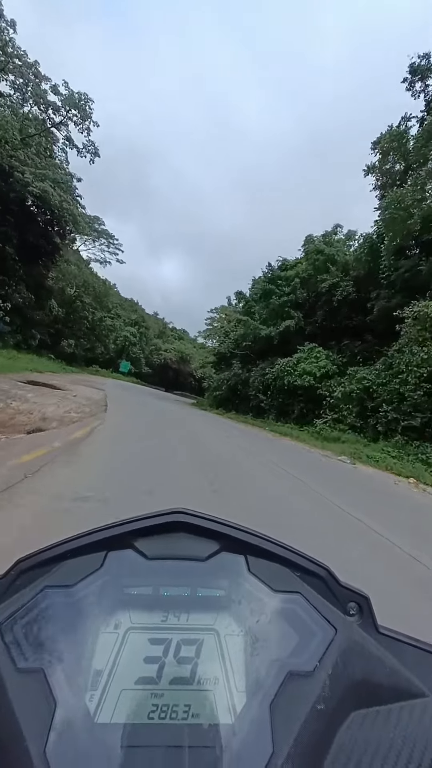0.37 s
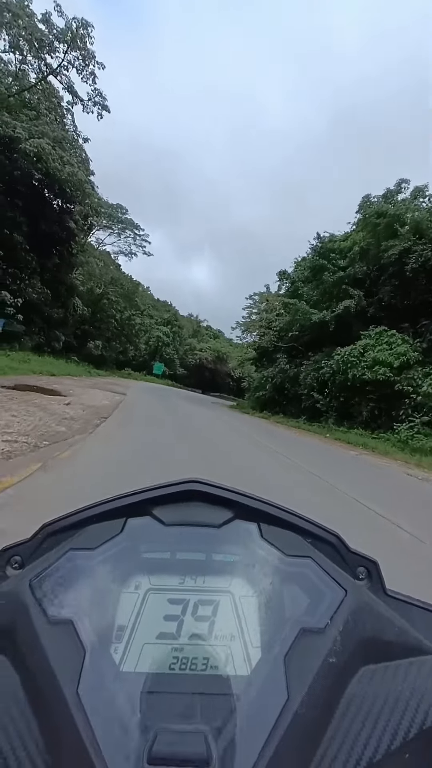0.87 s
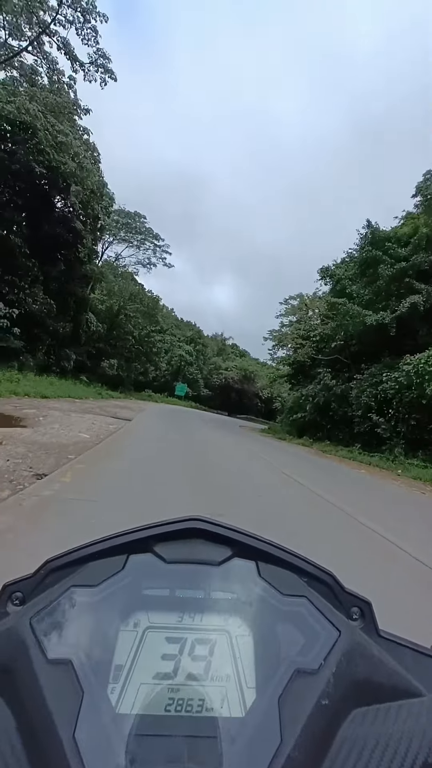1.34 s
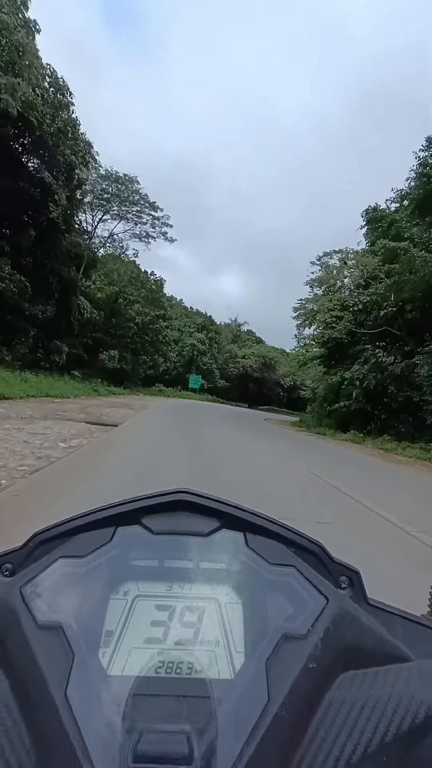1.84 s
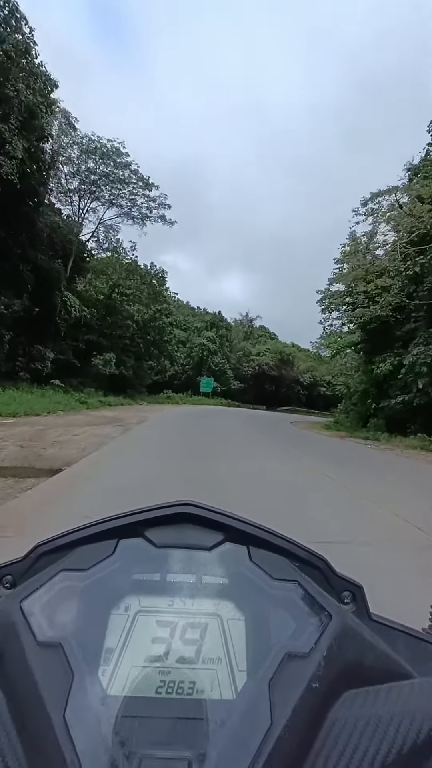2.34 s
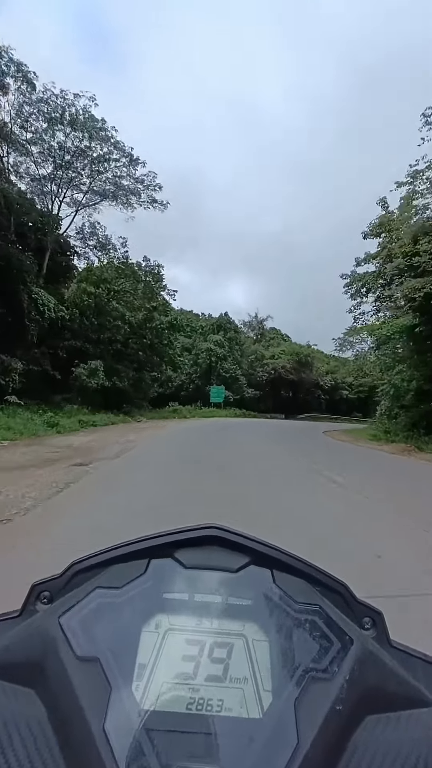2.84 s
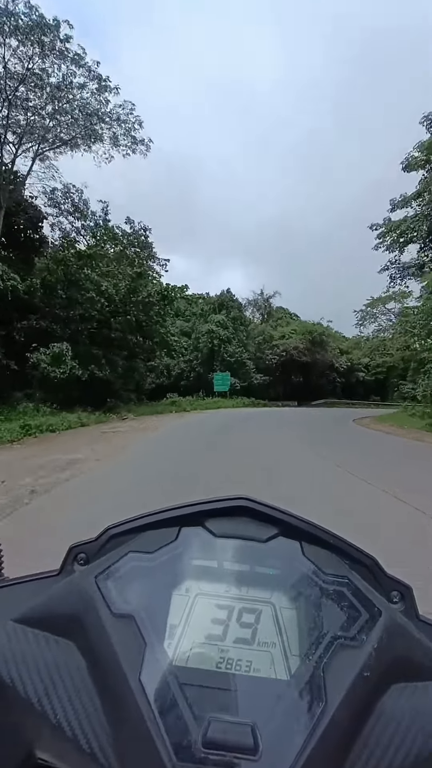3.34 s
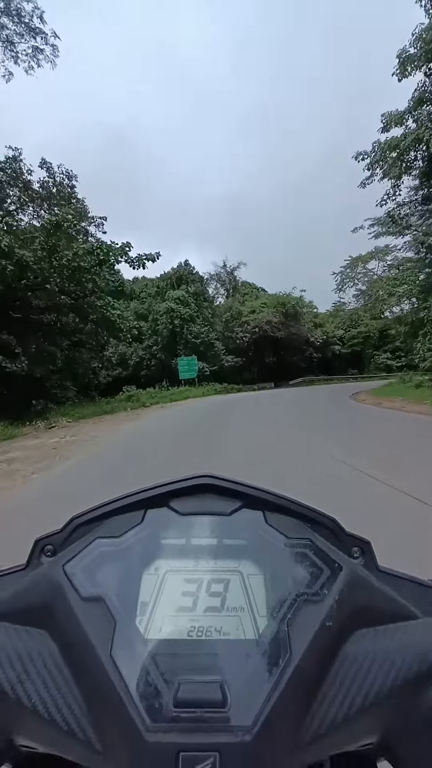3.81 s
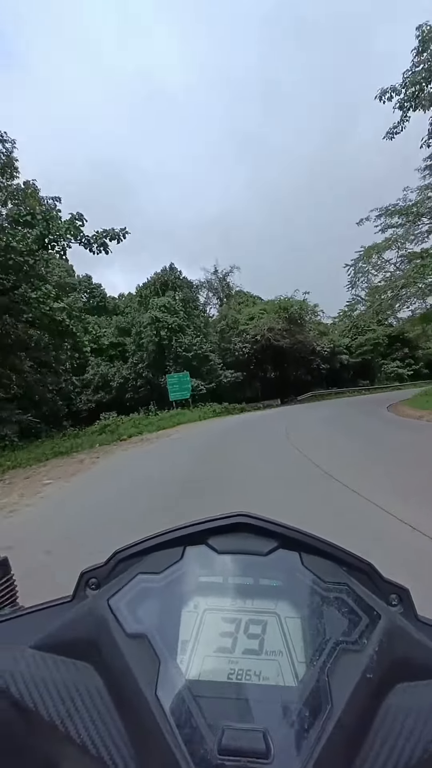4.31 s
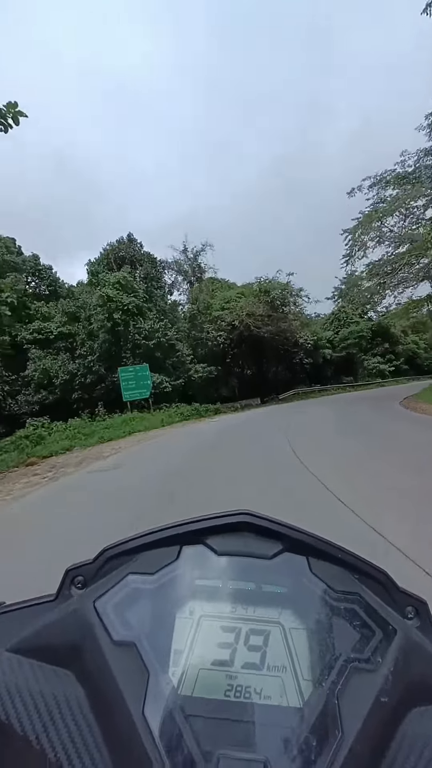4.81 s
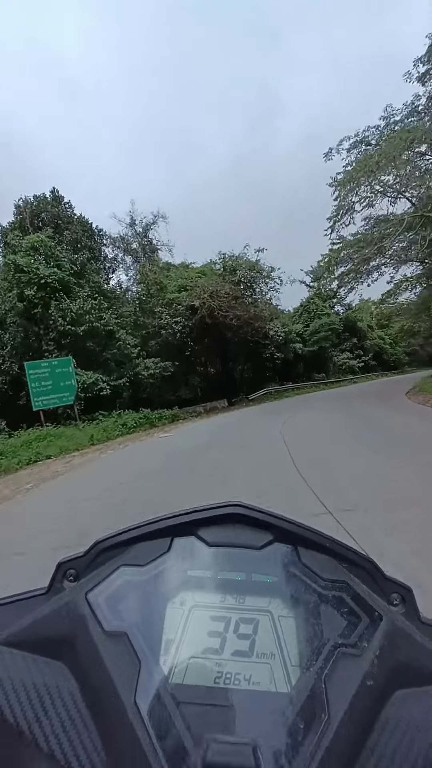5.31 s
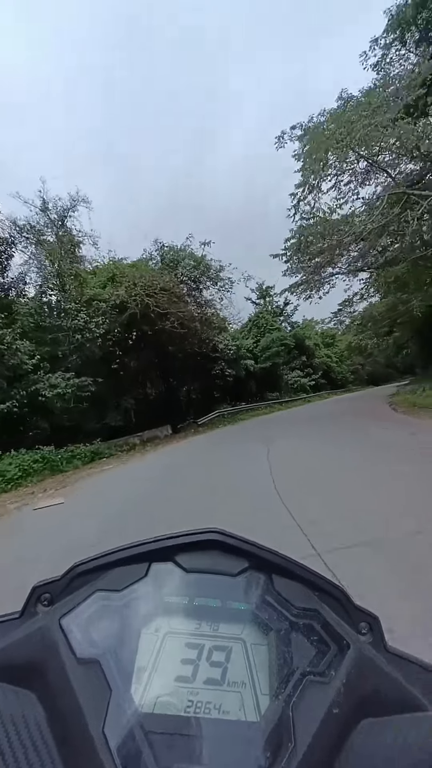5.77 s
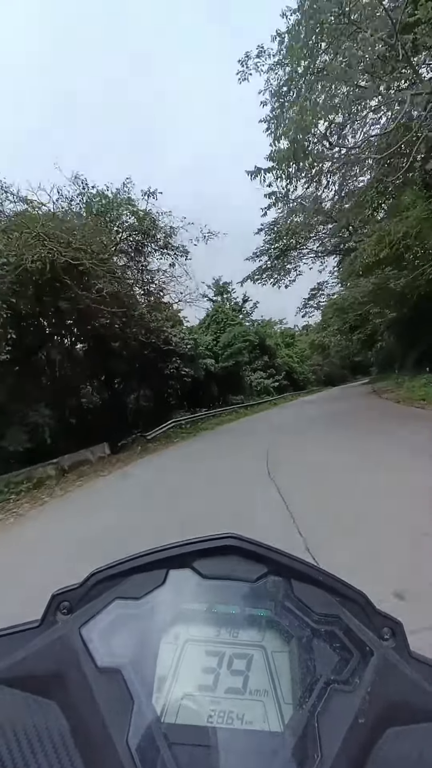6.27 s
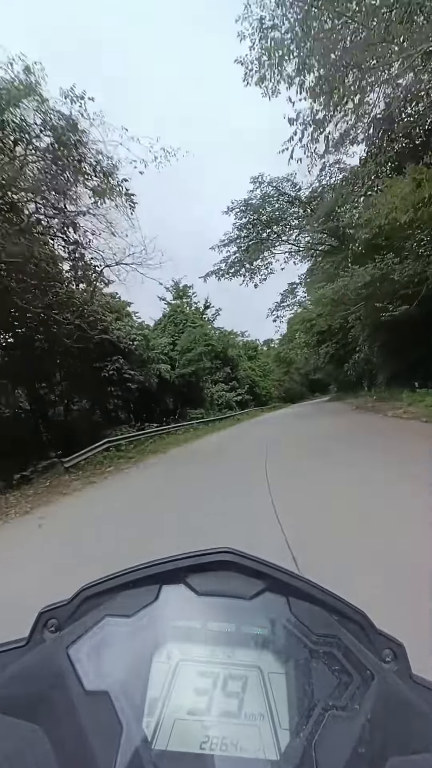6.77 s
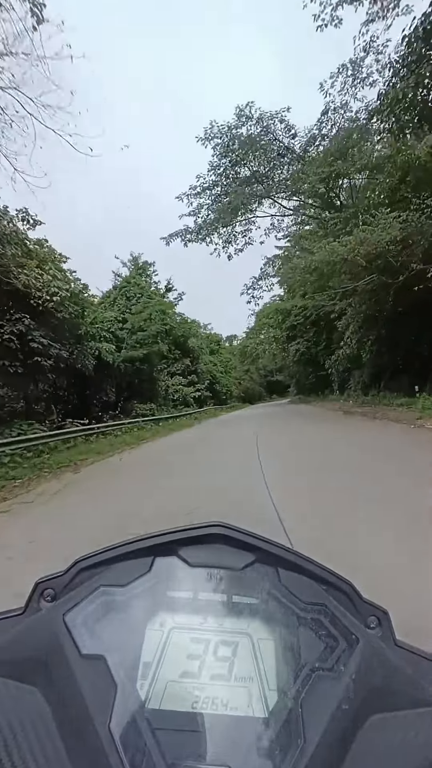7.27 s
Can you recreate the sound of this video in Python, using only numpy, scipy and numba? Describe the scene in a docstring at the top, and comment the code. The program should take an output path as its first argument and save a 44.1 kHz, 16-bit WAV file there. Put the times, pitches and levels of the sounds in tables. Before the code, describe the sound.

From 0 s to about 7.6 s a small scooter rides at a steady speed, its open stereo microphone battered by headwind. The wind is a dense low roar, fluttering and popping with irregular slaps, far louder and nearly overloaded on the right; the left is softer, with occasional thumps. Beneath it, mostly on the left, are a low, even engine hum, a faint grainy whine near 2.8 kHz and the airy hiss of tyres and foliage. From 0 to 1.3 s high, short friction squeaks chatter several times per wheel turn; they thin into scratchier, higher chirps about once a turn and cease around 3.3 s. The whine dips near 2 s, then returns. From about 4.5 s a very faint, high cicada buzz on the left grows, strongest after 6 s. Around 6.5 to 7 s hiss and whine rise, and the wind continues to an abrupt end.

```python
"""A small scooter rides a forest road at a steady speed, the two microphone ports open to the headwind.
From the start, convected eddies buffet each port on its own and drive a fast limiter, hardest on the right;
under them random resonances give the engine hum and belt whine, and shaped noise the hiss of tyres and leaves.
A friction squeak of tones and scrapes comes several times a wheel turn, then about once, for three seconds.
Later the cicadas, buzzing bands of noise, swell as the trees close in, and hiss and whine rise near the end."""
import sys
import numpy as np
from scipy import signal
from scipy.fft import rfft, irfft, next_fast_len
from scipy.io import wavfile
from scipy.ndimage import uniform_filter1d, minimum_filter1d, map_coordinates
from numba import njit

SR = 44100
rng = np.random.default_rng(int(sys.argv[2]) if len(sys.argv) > 2 else 0)


def boost_factor(decibels):
    """Convert a level in decibels to a linear amplitude factor."""
    exponent = np.asarray(decibels, float) / 20
    return 10 ** exponent


def wav_record(signal):
    """Record a signal, one row per channel, as 16-bit PCM in the file named by sys.argv[1]."""
    frames = np.transpose(np.atleast_2d(signal))
    bounded = np.clip(frames, -1, 1)
    # unit amplitude maps onto the largest positive 16-bit level
    quanta = np.round(bounded * 32767).astype(np.int16)
    wavfile.write(sys.argv[1], SR, quanta)


N = 336483
T = np.arange(N) / SR

# chorus resonances: pitch_hz, nominal_width_hz, relative_level_db
CICADA_BANDS = [(8160, 810, -5.5), (8620, 650, 1), (9170, 520, -6)]
# the chorus drifts in pitch as other trees pass; only departures from the mean count: time_s, centre_hz
CHORUS_DRIFT = [(0.0, 8690), (0.1, 8560), (6.82, 8540), (7.05, 8720), (7.63, 8660)]
CICADA_BUZZ_HZ, CICADA_BUZZ_DEPTH, CICADA_RIGHT_DB = 199, 0.15, -24

# spectral density of the broad hiss before the roadside gain: pitch_hz, left_db_per_hz, right_db_per_hz,
# likeness_of_channels (0-1; above about 6 kHz the two channels are mostly alike but for level)
HISS_SPECTRUM = [(255, -60.5, -43, 0.26), (880, -56, -52, 0.61), (1820, -68, -68, 0.25),
                 (2200, -63.5, -65, 0.35), (3210, -69, -72.5, 0), (3590, -72, -73, 0.24),
                 (5520, -77, -78.5, 0), (6200, -85.5, -82.5, 0.8), (6900, -91, -79, 1),
                 (7800, -84, -96, 0.9), (10500, -89.5, -96.5, 0.7), (11500, -90, -96, .6),
                 (13300, -100, -96, 1), (15700, -102, -92, 1)]
# slow courses along the road: time_s, hiss_gain_db, near_leaves_treble_gain_db, cicada_level_db, whine_level_db
ROADSIDE_COURSE = [(0, -1, 1.5, -50, -43), (1, -2.5, 1.5, -50.5, -43), (2, -1.5, 0.5, -49.5, -58),
                   (3, -2, 1, -48, -42), (4, -3, 1, -48.5, -43), (4.6, -1.5, 2.5, -46.5, -39),
                   (5.3, -2, 2.5, -46, -39), (6, -1, 3, -44.5, -40), (6.5, 1, 3, -45, -37.5),
                   (7, 0, 4.5, -44.5, -34.5), (7.63, 0.5, 5.5, -46, -36)]
LEAVES_HZ = 4170
PORT_LAG = 18  # samples by which the left port hears the scooter late

WHINE_HZ, WHINE_WIDTH_HZ, WHINE_RIGHT_DB = 2790, 390, -10

# wavering engine and gear tones: pitch_hz, nominal_width_hz, left_level_db
ENGINE_TONES = [(58.6, 5.1, -27), (167.4, 9.2, -36.5), (220, 3, -39), (334, 2.5, -51), (1479, 67, -47)]

# rubs of the squeak, crowded at first, several to a wheel turn, later about one a turn:
# start_s, length_s, low_mode_db, upper_pair_db
SQUEAK_RUBS = [(0, .06, -35, -50), (.12, .03, -35, -60), (.163, .02, -34, -60), (.243, .042, -32, -58),
               (.296, .022, -30, -47), (.378, .035, -38, -52), (.41, .025, -34, -47), (.433, .05, -31, -46),
               (.535, .018, -29, -60), (.555, .012, -33, -60), (.578, .026, -38, -58),
               (.605, .022, -32, -48), (.728, .026, -38, -52), (.754, .04, -31, -46),
               (.838, .024, -31, -52), (.913, .016, -30, -50), (.93, .05, -46, -49), (1.02, .025, -39, -60),
               (1.068, .04, -37, -60), (1.15, .03, -34, -60), (1.18, .045, -37, -60),
               (1.222, .035, -35, -46), (1.255, .04, -50, -49), (1.33, .05, -41, -58),
               (1.39, .055, -50, -47), (1.483, .034, -33, -56), (1.555, .04, -50, -48),
               (1.6, .027, -32, -60), (1.64, .02, -39, -60), (1.7, .055, -44, -47), (1.85, .06, -43, -47),
               (1.93, .08, -41, -56), (2.01, .03, -35, -45), (2.14, .12, -50, -47), (2.32, .09, -52, -47),
               (2.47, .07, -52, -47), (2.635, .05, -52, -47), (2.795, .065, -50, -47),
               (2.97, .04, -50, -49), (3.11, .04, -50, -48), (3.29, .04, -50, -49)]
# upper resonances of the squeak: pitch_hz, nominal_width_hz, level_db relative to the upper_pair_db of a rub
SQUEAK_UPPER_MODES = [(4310, 130, -1), (4620, 110, -2)]
SQUEAK_HZ, SQUEAK_WAVER_HZ, RUB_EDGE_S = 2860, 34, .008
SQUEAK_RIGHT_DB = (0, -5)  # low mode, upper pair

# slow course of the headwind: time_s, left_level_db, right_level_db, right_flow_speed_octaves
GUST_COURSE = [(0, -8, 4.5, -0.28), (.5, -11.5, 2.5, 0.0055), (.9, -11.5, -4, 0.035),
               (1.25, -11.5, 2, 0.064), (1.7, -8.5, 2, 0.095), (2.15, -11, 3, 0.13), (2.5, -10, 0, -0.079),
               (2.8, -9.5, 0, 0.078), (3.3, -9.5, 2, 0.1), (3.7, -6.5, 2, 0.013), (4.2, -11.5, -2.5, -.12),
               (4.65, -11, -0.5, 0.088), (4.95, -5.5, 3.5, .12), (5.25, -12.5, 1.5, -0.089),
               (5.5, -11.5, 0, 0.095), (5.95, -11, 1, -0.1), (6.4, -14, 1, -0.047), (7, -12.5, 0, 0.038),
               (7.63, -11.5, 0, -0.048)]
# longer spells of faster flow at the right port: centre_s, speed_up_octaves, length_s
FLOW_FLURRIES = [(0.489, 0.31, 0.047), (0.916, .4, 0.051), (1.261, .4, 0.079), (1.99, 0.31, .06),
                 (2.189, 0.34, 0.062), (2.699, 0.35, 0.072), (3.682, 0.29, 0.081), (4.621, 0.41, 0.089),
                 (4.878, .35, .14), (5.47, 0.38, 0.049), (5.66, .3, 0.051), (7.0, 0.36, 0.058),
                 (7.58, 0.32, 0.067)]
# pressure spectrum of the flow, before scaling to rms 1: pitch_hz_at_mean_speed, left_db_per_hz, right_db_per_hz
FLOW_SPECTRUM = [(12.1, 6.5, 13.5), (25.4, 3.5, 7), (62, -6.5, 5.5), (123, -4, 3.5), (234, -11.5, -1),
                 (451, -20, -8.5), (793, -31, -25.5), (1300, -42, -39.5), (2500, -77, -78)]
# strongest small fast eddies: time_s, port (0 left, 1 right), nominal_top_pitch_hz, length_ms,
# slap_db (over the gust level, before SLAP_DB)
STRONG_EDDIES = [(0.06, 1, 1310, 2.27, -18), (0.13, 1, 960, 2.28, -13), (0.132, 0, 594, 3.7, 4),
                 (0.187, 1, 1310.0, 2.2, -20), (0.373, 1, 693, 4.6, -17), (0.473, 1, 935, 2.55, -10),
                 (0.493, 1, 1200.0, 2.6, -23), (0.559, 1, 1656, 2, -12.5), (0.704, 1, 722, 3.0, -9),
                 (0.906, 1, 693, 2.6, 1), (0.919, 0, 1317, 3.27, -5), (0.987, 1, 1884, 2.23, -16),
                 (1.151, 1, 1239, 2.4, -20), (1.181, 0, 801.3, 6.26, -11), (1.24, 1, 788, 3.96, -5),
                 (1.282, 1, 1123, 2.93, -12), (1.446, 0, 624, 3.0, -1), (1.487, 1, 1177, 2.64, -19),
                 (1.576, 0, 521.7, 6.6, -6), (1.615, 0, 787.3, 5.03, -9), (1.626, 0, 777, 3.4, -7),
                 (1.782, 1, 1193, 3.7, -28), (1.822, 1, 1300.0, 2.74, -20), (1.839, 0, 590.2, 3.02, -5),
                 (1.963, 1, 731.8, 3.32, -12), (2.006, 1, 1097, 2.34, -12), (2.177, 1, 1169, 2.42, -14),
                 (2.193, 1, 1226, 2.95, -19), (2.517, 1, 749.5, 3.22, -4.5), (2.614, 1, 880.0, 3.2, -8),
                 (2.695, 1, 1343, 2.73, -29), (2.72, 1, 1161, 2.05, -17), (2.868, 1, 2170.0, 1.96, -23),
                 (2.918, 1, 720.8, 2.87, -5), (3.143, 1, 1160.0, 3.96, -25), (3.17, 1, 2060, 2.06, -17),
                 (3.363, 1, 1288, 2.5, -13), (3.593, 1, 689, 3.26, -13), (3.636, 0, 810.0, 2.52, -12),
                 (3.649, 1, 1356, 2.65, -15), (3.693, 0, 621, 3.25, -2), (3.727, 0, 519, 4.8, -2),
                 (3.75, 1, 919.3, 2.62, -17), (3.871, 0, 612.3, 3.02, -5), (4.01, 1, 920.8, 2.46, -13),
                 (4.584, 1, 1031, 3.5, -19), (4.615, 1, 1121, 4, -25), (4.64, 1, 1002, 2.3, -7),
                 (4.728, 1, 580.3, 4.38, -8), (4.84, 1, 1211, 2.08, -12), (4.87, 1, 981.6, 2.72, -16),
                 (4.919, 1, 1122, 2.48, -18), (4.937, 1, 936.7, 2.8, -18), (5.007, 1, 1143, 2.56, -26),
                 (5.054, 0, 730.6, 3.83, -13), (5.075, 1, 1105, 2.92, -12.5), (5.185, 0, 791, 2.79, -2),
                 (5.456, 1, 980.0, 4.38, -12), (5.474, 1, 1128, 5.03, -9), (5.544, 1, 941.4, 2.68, -14),
                 (5.654, 1, 1216, 2.2, -9), (5.932, 1, 1229, 2.24, -15), (6.243, 1, 928.3, 5.2, -9),
                 (6.362, 0, 751, 3.04, -5), (6.544, 1, 1182, 2.46, -18), (6.575, 1, 1265, 2.57, -18),
                 (6.645, 1, 1269, 2.87, -19), (6.736, 1, 1725, 1.95, -21), (6.751, 1, 1314, 2.51, -18),
                 (6.997, 1, 941.2, 3.0, -1), (7.067, 1, 1026, 3.22, -13), (7.086, 1, 1208, 2.11, -18),
                 (7.127, 1, 1214, 3.2, -19), (7.219, 1, 884.6, 3.42, -13), (7.265, 0, 541, 2.87, 2),
                 (7.401, 1, 1233, 2.14, -17), (7.571, 1, 1116, 2.25, -8), (7.608, 1, 1209, 2.36, -12)]
# lesser eddies at each port come at random; the slowest is the longest
STRAY_EDDIES, STRAY_HZ, STRAY_MS = 70, (449.95, 848.5), (3, 1.5)
GUSTS_PER_S = 12  # quick random gusts on top of the slow course
EDDY_REST_HZ = 230  # eddy pitch at the mean flow speed
EDDY_PULL = .58  # share of an eddy's speed-up that the surrounding flow takes on
# an eddy gathers speed slowly and tears off at once, in eddy lengths
BUILD_UP, BREAK_OFF, TEARS_AT = 1.2, .12, .25
SLAP_DB = 1  # common level of the slaps
SLAP_SWEEP_OCTAVES, SLAP_SHARPNESS = 1.8, .17  # rise in pitch through a slap, share of its overtone

LOW_CUT_HZ, FADE_S = 52, .006  # the fade is at both ends
CEILING, RELEASE_S, LOOK_AHEAD_S = .87, .011, .0015  # limiter; the ceiling is an amplitude


def band(x, hz, width):
    """Second-order resonance with gain 1 at its centre."""
    return signal.lfilter(*signal.iirpeak(hz, hz / width, fs=SR), x)


def double_band(x, hz, width):
    """Two equal resonances in cascade, for steeper skirts."""
    return band(band(x, hz, width), hz, width)


def unit(x):
    """Normalisation to rms 1."""
    return x / np.sqrt(np.mean(x ** 2))


def spectrum(table, column, count):
    """Spectral interpolation: a column on the bins of a transform of count samples, straight on a log axis."""
    table = np.array(table, float)
    hz = np.arange(count // 2 + 1) * SR / count + 1
    return np.interp(np.log(hz), np.log(table[:, 0]), table[:, column])


def walk(rate):
    """Band-limited random modulation: levels held 1 / rate s and slewed twice; spread near 1."""
    hold = int(SR / rate)
    steps = np.repeat(rng.standard_normal(N // hold + 1), hold)
    return 1.3 * uniform_filter1d(uniform_filter1d(steps, hold), hold)[:N]


def curves(table):
    """Linear interpolation of every column of a timed table, sample by sample."""
    s, *columns = np.transpose(table)
    return np.array([np.interp(T, s, c) for c in columns])


def shift_pitch(x, drift_hz):
    """Single-sideband shift: the analytic signal turned by a running phase moves by drift_hz."""
    turning = np.exp(2j * np.pi * np.cumsum(drift_hz) / SR)
    return np.real(signal.hilbert(x, next_fast_len(N))[:, :N] * turning)


def cicadas(level_db):
    """Amplitude-modulated resonant noise: a chorus in three bands with a faint common buzz, mostly on the left."""
    buzz = 1 + CICADA_BUZZ_DEPTH * np.sin(2 * np.pi * CICADA_BUZZ_HZ * T)
    noise = rng.standard_normal((2, N)) * buzz
    chorus = sum(boost_factor(db) * double_band(noise, hz, 1.2 * width) for hz, width, db in CICADA_BANDS)
    centre = curves(CHORUS_DRIFT)[0]
    chorus = shift_pitch(chorus, centre - centre.mean())
    return unit(chorus) * boost_factor(level_db + np.array([[0], [CICADA_RIGHT_DB]]))


def hiss(level_db, leaves_db):
    """Partial coherence: broad noise partly common to both channels; its low part comes late on the left."""
    like = np.clip(spectrum(HISS_SPECTRUM, column=3, count=N), 0, 1)
    common, left_own, right_own = rfft(rng.standard_normal((3, N)))
    hz = np.arange(len(common)) * SR / N
    late = np.exp(-2j * np.pi * hz * PORT_LAG / SR * (hz < 6000))
    left = np.sqrt(like) * late * common + np.sqrt(1 - like) * left_own
    right = np.sqrt(like) * common + np.sqrt(1 - like) * right_own
    channels = [boost_factor(spectrum(HISS_SPECTRUM, column=1 + k, count=N)) * x for k, x in enumerate((left, right))]
    broad = irfft(channels, N) * np.sqrt(SR / 2)  # from level per Hz to noise level
    treble = signal.sosfilt(signal.butter(2, LEAVES_HZ, "high", fs=SR, output="sos"), broad)
    return (broad + (boost_factor(leaves_db) - 1) * treble) * boost_factor(level_db + 0.39 * walk(8.4))


def whine(level_db):
    """Narrow-band noise: a rough, grainy band from the drive that wanders in pitch, mostly on the left."""
    rough = double_band(rng.standard_normal((2, N)), WHINE_HZ, WHINE_WIDTH_HZ)
    wandering = shift_pitch(rough, 45 * walk(16))
    grain_db = 1.3 * walk(16) + 2.6 * walk(90)
    return unit(wandering) * boost_factor(level_db + grain_db + np.array([[0], [WHINE_RIGHT_DB]]))


def engine():
    """Noise-driven resonances: narrow tones whose level and phase wander."""
    return sum(boost_factor(db) * unit(double_band(rng.standard_normal(N), hz, width)) for hz, width, db in ENGINE_TONES)


def squeak():
    """Friction excitation: each rub sounds a buzzy low tone and scrapes two broader upper resonances."""
    low, upper = np.zeros((2, N))
    for s, length, low_db, upper_db in SQUEAK_RUBS:
        rub = np.clip(np.minimum(T - s, s + length - T) / RUB_EDGE_S, 0, 1)
        low += boost_factor(low_db) * rub
        upper += boost_factor(upper_db) * rub
    tone = np.sin(2 * np.pi * np.cumsum(SQUEAK_HZ + SQUEAK_WAVER_HZ * walk(400)) / SR)
    scrape = sum(boost_factor(db) * unit(double_band(rng.standard_normal(N), hz, width))
                 for hz, width, db in SQUEAK_UPPER_MODES)
    return np.array([boost_factor(2.1 * walk(240)) * low * tone, boost_factor(2 * walk(60)) * upper * scrape])


def stray_eddies(port):
    """Random arrivals: lesser eddies scattered evenly in time, without slaps."""
    chance = rng.random((STRAY_EDDIES, 2))
    return [(when * N / SR, port, np.interp(u, (0, 1), STRAY_HZ), np.interp(u, (0, 1), STRAY_MS), None)
            for when, u in chance]


def wind(port, course_db, speed, gust_db, gust_octaves, flutter, flicker_db, lift_db):
    """Frozen convection: a fixed pattern of eddies swept past the port rises in pitch where the flow is faster."""
    octaves = speed + gust_octaves * walk(GUSTS_PER_S) + flutter * (walk(190) + .6 * walk(70))
    stray = stray_eddies(port)
    slaps, turn = np.zeros(N), 2 * np.pi * rng.random()
    for k, (s, side, hz, ms, slap_db) in enumerate(list(STRONG_EDDIES) + stray):
        if round(side) != port:
            continue
        near = slice(max(int((s - .03) * SR), 0), int((s + .03) * SR))
        since = (T[near] - s) / (ms / 1000) - TEARS_AT
        shape = np.exp(-.5 * (since / np.where(since < 0, BUILD_UP, BREAK_OFF)) ** 2)
        octaves[near] += (np.log2(hz / EDDY_REST_HZ) - octaves[near]) * shape * EDDY_PULL
        if slap_db is not None:  # a strong eddy also slaps the port with a few quickening swings
            slap_hz = hz * 2 ** (SLAP_SWEEP_OCTAVES * (shape - .9))
            phase = 2 * np.pi * np.cumsum(slap_hz) / SR + k * turn
            swing = np.sin(phase) + SLAP_SHARPNESS * np.sin(2 * phase)
            slaps[near] += boost_factor(slap_db) * shape ** np.where(since < 0, 3, 1) * swing
    place = np.cumsum(2 ** octaves)  # reading point in the pattern
    count = next_fast_len(3 * N)
    density = boost_factor(spectrum(FLOW_SPECTRUM, column=1 + port, count=count))
    eddies = unit(irfft(rfft(rng.standard_normal(count)) * density, count))
    gust = course_db + gust_db * walk(GUSTS_PER_S)
    # lift_db is the gain in pressure per octave of flow speed
    force = boost_factor(gust + lift_db * octaves + flicker_db * walk(75))
    buffeting = map_coordinates(eddies, [place], order=3, mode="wrap") * force
    return buffeting + slaps * boost_factor(gust + SLAP_DB)


def scene():
    """Superposition: wind apart on each port; the scooter reaches the right port first."""
    left_db, right_db, right_speed = curves(GUST_COURSE)
    for s, rise, length in FLOW_FLURRIES:
        right_speed = right_speed + rise * np.exp(-.5 * (2 * (T - s) / length) ** 2)
    hiss_db, leaves_db, cicada_db, whine_db = curves(ROADSIDE_COURSE)
    left = wind(port=0, course_db=left_db, speed=0, gust_db=1.55, gust_octaves=.05,
                flutter=.25, flicker_db=3.0, lift_db=2.5)
    right = wind(port=1, course_db=right_db, speed=right_speed, gust_db=0.6, gust_octaves=0.04,
                 flutter=.27, flicker_db=4.0, lift_db=0.0)
    hum, rub = engine(), squeak()
    scooter_left = np.roll(hum + rub.sum(axis=0), PORT_LAG)
    scooter_right = boost_factor(-40) * hum + boost_factor(np.array(SQUEAK_RIGHT_DB)) @ rub
    scooter = np.array([scooter_left, scooter_right])
    return np.array([left, right]) + hiss(hiss_db, leaves_db) + cicadas(cicada_db) + whine(whine_db) + scooter


@njit
def recover(need, rate):
    """Exponential release: the gain drops at once to what is needed and creeps back to 1."""
    gain, g = np.empty(len(need)), 1.
    for i in range(len(need)):
        g = min(need[i], g + (1 - g) * rate)
        gain[i] = g
    return gain


def limiter_gain(x):
    """Look-ahead peak limiting on each channel: a gust over the ceiling ducks everything on its side."""
    ahead = int(LOOK_AHEAD_S * SR)
    need = np.minimum(1, CEILING / (np.abs(x) + 1e-9))
    need = minimum_filter1d(need, 2 * ahead + 1, axis=1)
    gain = np.array([recover(n, 1 / (RELEASE_S * SR)) for n in need])
    return uniform_filter1d(gain, ahead, axis=1)


def low_pass(x):
    """Removes everything above the highest recorded frequency."""
    return signal.sosfilt(signal.butter(12, 15690, fs=SR, output="sos"), x)


def record(dry):
    """High-pass filtering and dynamic compression: a low cut, the limiter and short fades at both ends."""
    dry = signal.sosfilt(signal.butter(2, LOW_CUT_HZ, "high", fs=SR, output="sos"), dry)
    fade = np.minimum(np.minimum(T, T[-1] - T) / FADE_S, 1)
    mix = fade * dry * limiter_gain(dry)
    return low_pass(mix)


dry = scene()
out = record(dry)
wav_record(out)
```